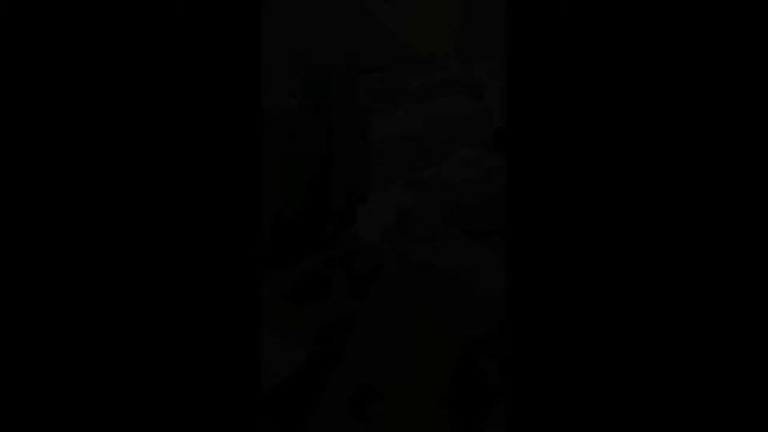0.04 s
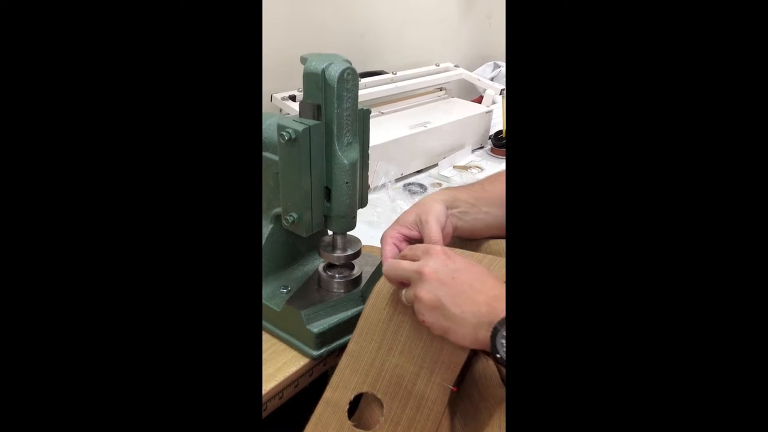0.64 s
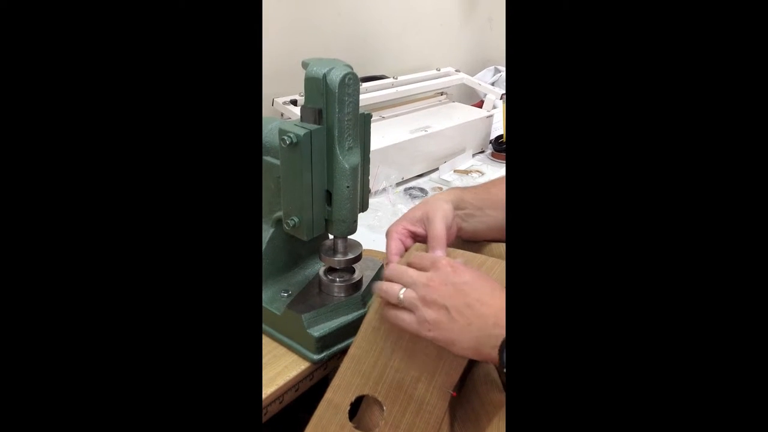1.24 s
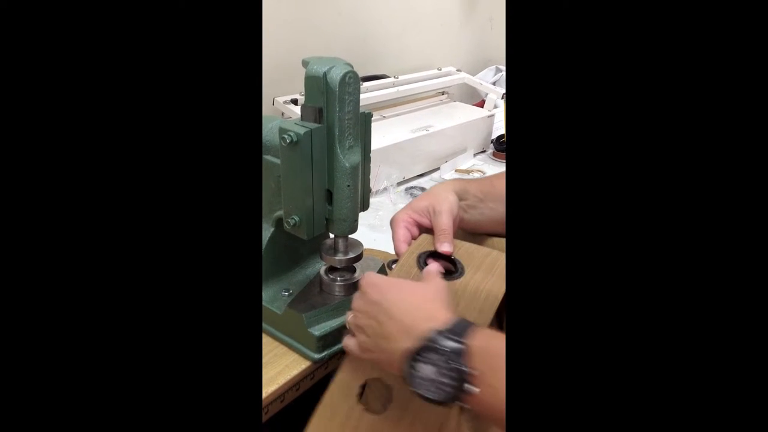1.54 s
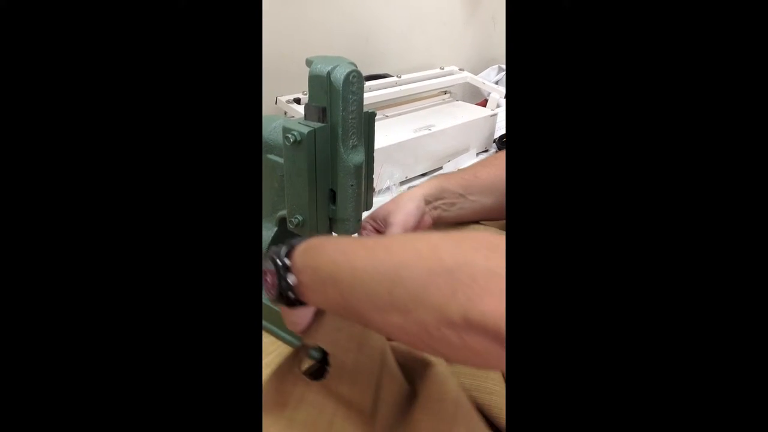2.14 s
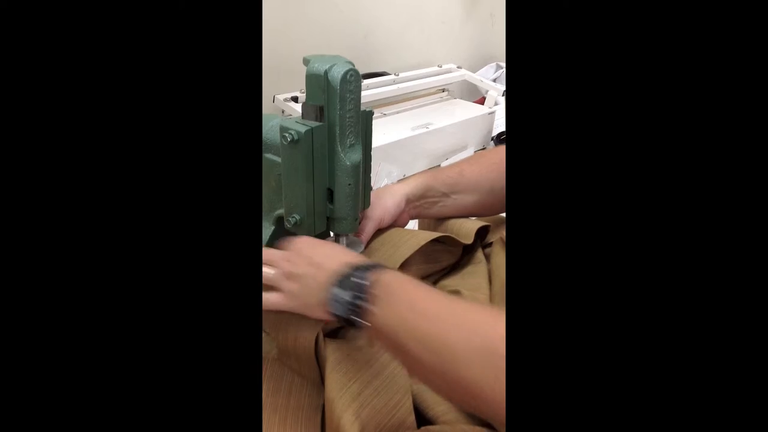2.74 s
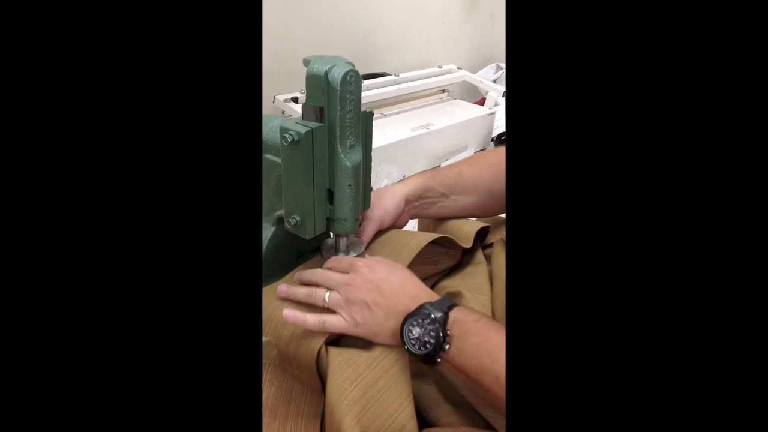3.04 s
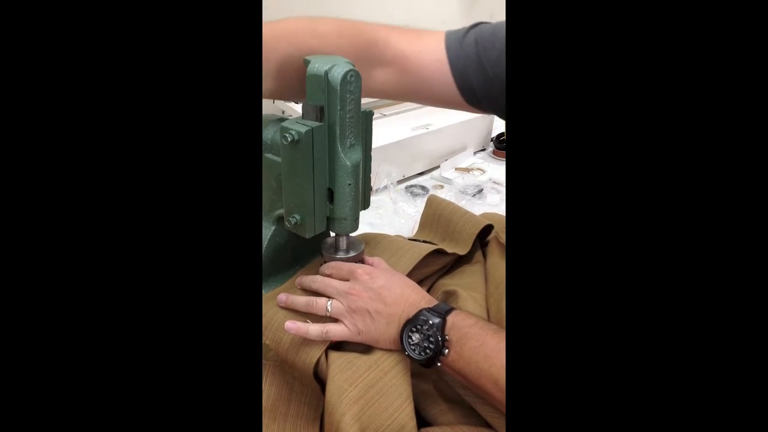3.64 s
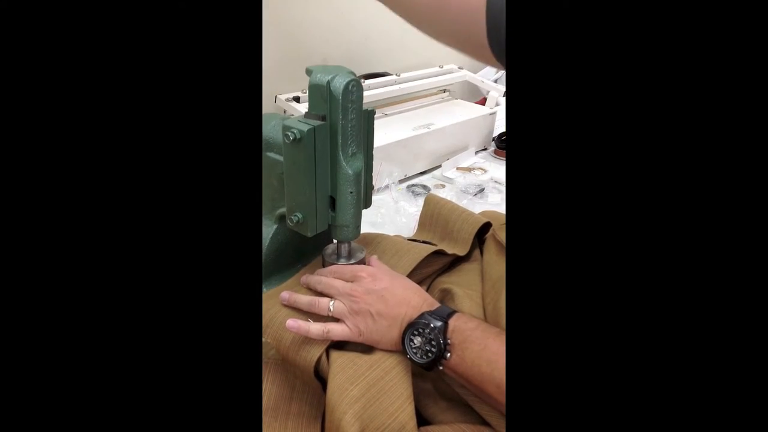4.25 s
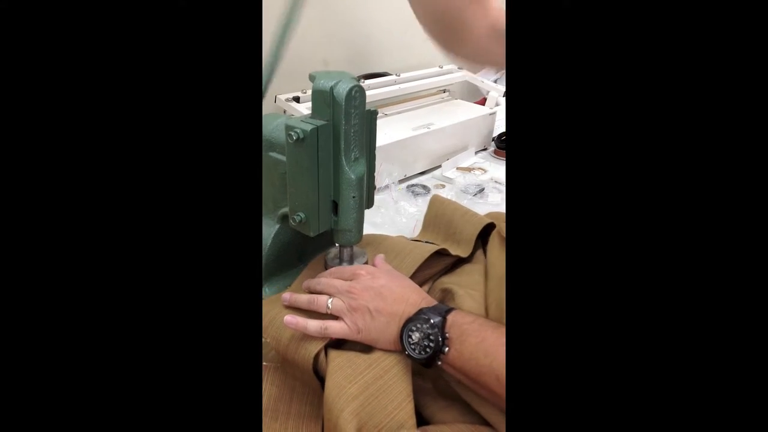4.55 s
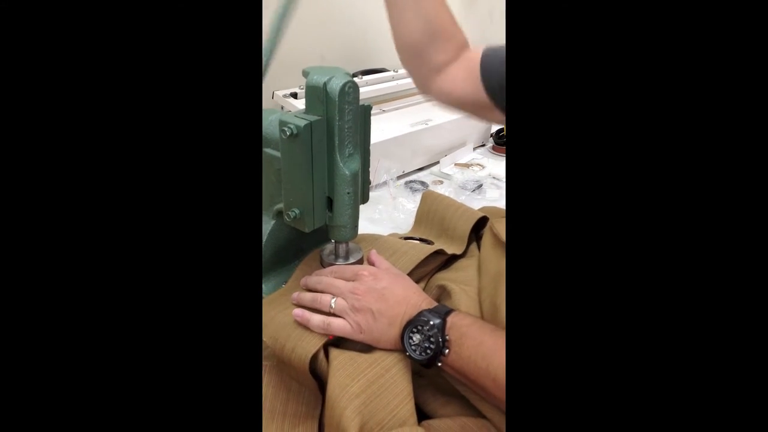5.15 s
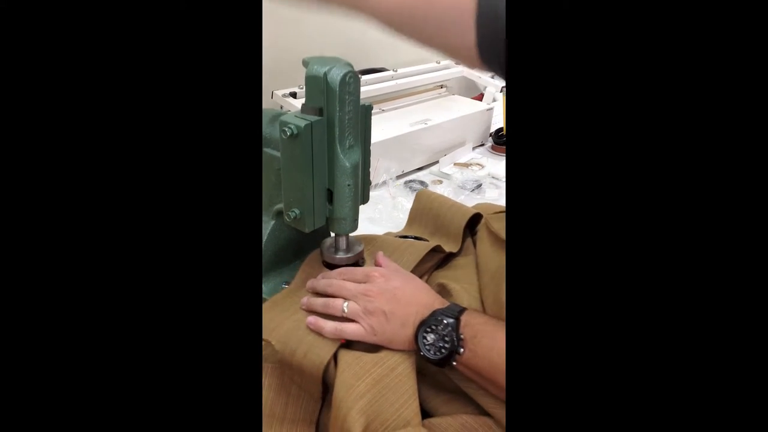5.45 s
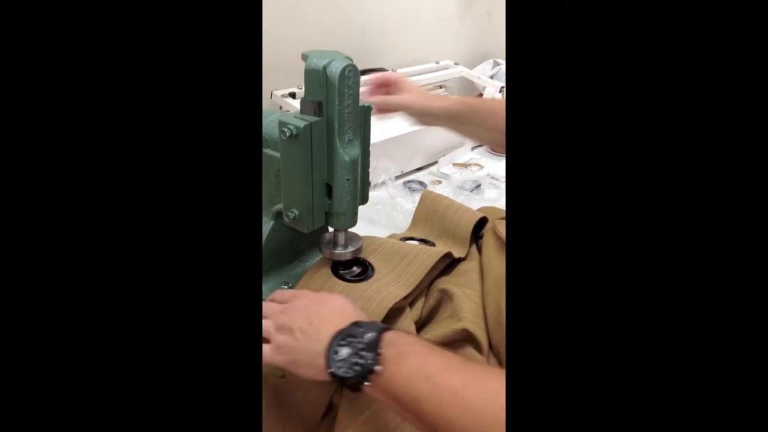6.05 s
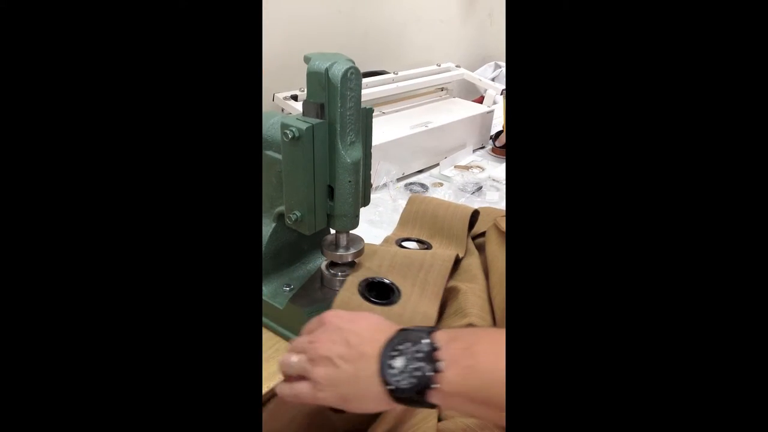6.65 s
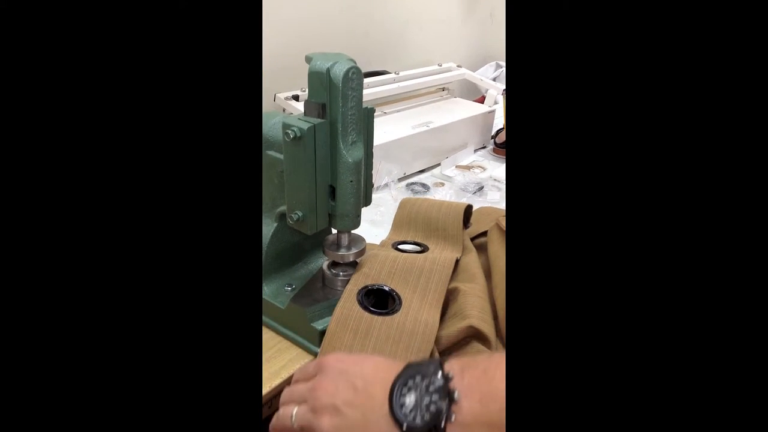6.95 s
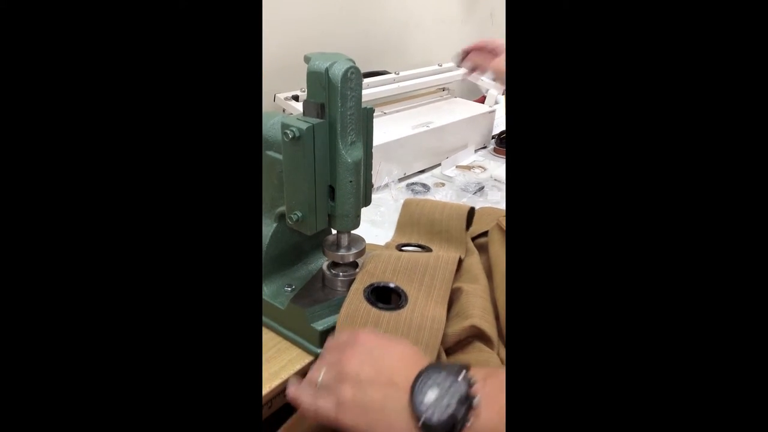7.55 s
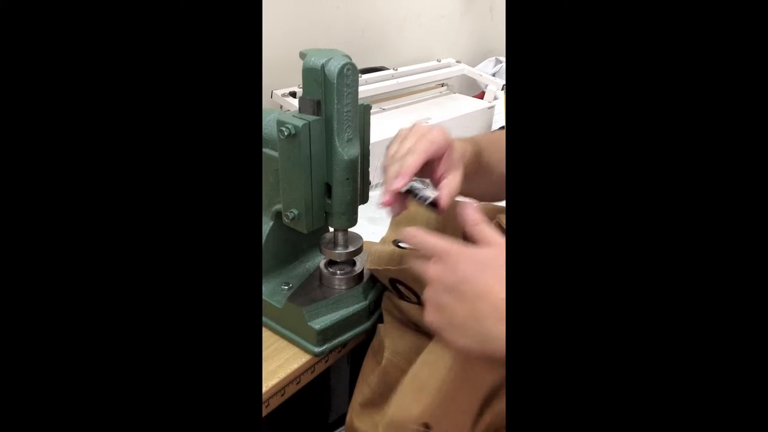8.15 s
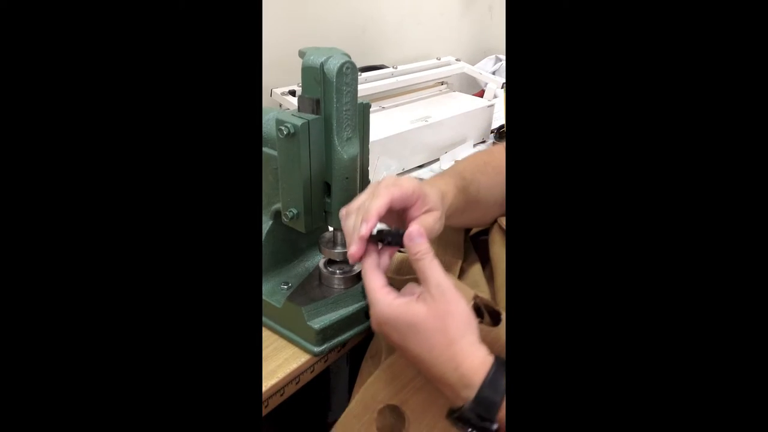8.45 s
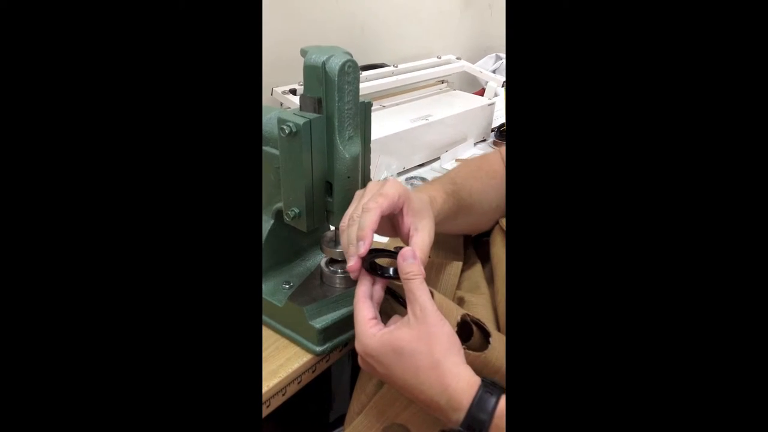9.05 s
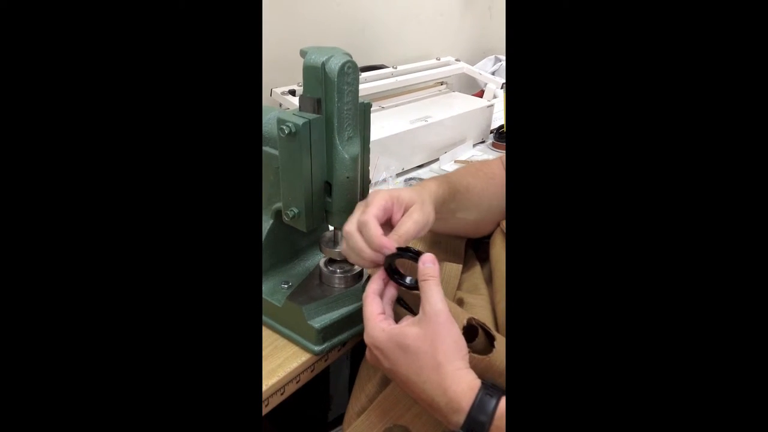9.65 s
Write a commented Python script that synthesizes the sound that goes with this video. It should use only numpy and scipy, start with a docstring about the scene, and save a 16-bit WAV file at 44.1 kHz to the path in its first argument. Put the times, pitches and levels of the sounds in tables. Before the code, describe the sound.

A hand-lever press crunches a metal ring into cloth and clacks back, amid small clinks, rustles and steady ventilation.

```python
"""Setting a curtain grommet

A hand-lever press works on a bench in a small room. Metal rings clink, the lever clunks down in its
iron frame, the ring crunches through the cloth, and the steel ram slides back and clacks on its stop.
Then the cloth is pulled away and the next ring is picked up, over the steady rush of ventilation."""
import sys
import numpy as np
from scipy import signal
from scipy.io import wavfile
from scipy.ndimage import uniform_filter1d

SR = 44100
rng = np.random.default_rng(int(sys.argv[2]) if len(sys.argv) > 2 else 0)


def to_wav(s):
    """Save 16-bit WAV."""
    ch = np.atleast_2d(s).T  # columns
    pcm = np.round(np.clip(ch, -1, 1) * 32767)  # PCM
    wavfile.write(sys.argv[1], SR, pcm.astype(np.int16))


N = 436149

# Knocks in the frame. Each row: start in seconds, relative level in dB, relative treble in dB.
KNOCKS = [(3.756, -31.5, -76), (3.799, -16, -28.5), (3.817, -22, -35.5), (3.878, -25, -48),
          (5.018, -21, -51), (5.035, -18.5, -37), (5.256, -15.5, -39), (5.268, -12.5, -42),
          (5.373, -27.5, -54), (5.68, -3.5, -22.5), (5.687, -8, -14), (5.765, -21.5, -38)]
# The tone of a knock. Each row: frequency in Hz, level in dB.
IRON_TONE = [(30, -49.5), (100, -21), (200, -1.5), (330, -6), (450, -7.5), (620, -1), (1100, 1),
             (1800, -3.5), (2700, -7.5), (4500, -11.5), (6000, -14), (7500, -20), (15000, -24.5)]
# The frame's notes. Each row: pitch in Hz, level in dB, seconds to die away.
FRAME_NOTES = [(188, -14, 0.24), (498, -6.5, 0.26), (571, 0, .2), (706, 0, 0.14), (932, -5, 0.14),
               (1048, -8, 0.12), (1207, -2, .22), (1325, -1, 0.11), (1480, -8, 0.16), (1873, -5.5, 0.41),
               (2450, -4.5, 0.21), (2570, -9, .17), (3106, -14.5, 0.17), (3660, -11, 0.18),
               (4030, -9.5, 0.22)]
def knocks():
    """The lever and ram knock in the iron frame and set it ringing."""
    return blows(KNOCKS, IRON_TONE, FRAME_NOTES, decay_s=0.062, body_db=-8, bite_db=-1.5, crack_db=0,
                 crack_time_share=0.55, ring_db=-19.5, tail_db=-22.5, tail_s=0.17)


# The grommet's snaps. Each row: start in seconds, relative level in dB, relative treble in dB.
SNAPS = [(4.345, -37, -45.5), (4.351, -33.5, -47), (4.472, -16.5, -19.5), (4.476, -22, -22),
         (4.502, -28, -25), (4.516, -29, -31), (4.533, -21.5, -16), (4.554, -16.5, -15),
         (4.618, -25.5, -53), (5.4225, -30.5, -38), (5.546, -27.5, -36.5)]
# The tone of a snap. Each row: frequency in Hz, level in dB.
SNAP_TONE = [(30, -32), (100, -14.5), (200, -1.5), (330, -5.5), (550, -9), (900, 0.5), (2000, -3.5),
             (4000, 0.5), (9000, 3), (15000, -1)]
# The grommet's brief notes. Each row: pitch in Hz, level in dB, seconds to die away.
GROMMET_NOTES = [(578, 1, .12), (1520, -3, .09), (3390, -1, .12)]
def snaps():
    """The ring's teeth snap through the cloth, settle, and let go of the die that shapes them."""
    return blows(SNAPS, SNAP_TONE, GROMMET_NOTES, decay_s=0.025, body_db=-11, bite_db=-7, crack_db=-2.5,
                 crack_time_share=1, ring_db=-20, tail_db=-31.5, tail_s=0.12)


# The ram's landing. Each row: start in seconds, level in dB.
RAM_LANDINGS = [(5.688, -20.5)]
# The ram's high notes. Each row: pitch in Hz, level in dB, seconds to die away.
RAM_NOTES = [(5400, -19, .08), (5900, -8, .05), (6100, -1, 0.066), (6060, -2, .05), (5970, -26, .33),
             (8280, -17, .1)]
def ram_stop():
    """The ram, the steel rod that the lever drives, rings when it lands on its stop."""
    out = np.zeros(N)
    for start, db in RAM_LANDINGS:
        add(out, start, amp(db) * ringing(RAM_NOTES, scatter_db=3))
    return out


# Thuds in the bench. Each row: start in seconds, relative level in dB.
THUDS = [(3.556, -41.5), (4.676, -30.5), (4.813, -28), (4.973, -35), (5.04, -29), (5.413, -33)]
# The bench's low notes. Each row: pitch in Hz, level in dB, seconds to die away.
BENCH_NOTES = [(126.6, -16, .2), (176.4, -6, 0.34), (215, -1.5, 0.12), (239, 0, 0.092), (352, -8, 0.18)]
def thuds():
    """The bench takes the load with a dull thud."""
    out = np.zeros(N)
    for start, db in THUDS:
        add(out, start, amp(db - 3.5) * ringing(BENCH_NOTES, contact_s=0.0027))
    return out


# Moves of the lever, and at 4.45 s the ring's crush through the cloth. Each row: start and length in seconds,
# scrape and hiss levels in dB, the groan's first and last pitch in Hz.
MOVES = [(3.757, 0.067, -41, -69, 1100, 800), (3.787, 0.075, -27.5, -59, 710, 450),
         (3.871, 0.08, -38.5, -65, 900, 1200), (4.45, 0.18, -34, -36, 560, 510),
         (4.675, .12, -46, -73, 1400, 1240), (4.799, .11, -35.5, -42, 740, 2800),
         (5.061, 0.14, -40.5, -43, 1210, 1450), (5.187, .2, -37, -56, 1110, 300),
         (5.348, 0.068, -33, -49, 900, 1240), (5.56, 0.17, -65.5, -58.5, 896, 770)]
# The tones of the scrape and the hiss. Each row: frequency in Hz, level in dB.
SCRAPE_TONE = [(40, -43), (120, -10), (200, 3), (400, 2), (600, 1.5), (900, -2.5), (1300, -1.5), (2400, -8),
               (3500, -12), (15000, -40)]
HISS_TONE = [(200, -23.5), (1500, 7.5), (3500, -1.5), (6000, 2), (9000, -0.5), (15000, -2)]
def rubbing():
    """The ram rubs along its guide, louder when faster; its groan glides as the load shifts. One stroke is
    instead the ring crunching through the cloth."""
    scrape = friction(SCRAPE_TONE, slips_per_s=2500, spread_db=0.5, flutter_db=1.5)
    hiss = friction(HISS_TONE, slips_per_s=8300, spread_db=1.5, flutter_db=0.8)
    out = np.zeros(N)
    for start, length, scrape_db, hiss_db, from_hz, to_hz in MOVES:
        speed = swell(length, peak_share=0.36, sharpness=1.31)
        slips = evened(during(scrape, start, len(speed)))
        groan = evened(resonate(slips, np.linspace(from_hz, to_hz, len(speed)), width_hz=220))
        add(out, start, speed * amp(scrape_db) * evened(slips + amp(-1.5) * groan))
        add(out, start, speed * amp(hiss_db) * evened(during(hiss, start, len(speed))))
    return out


# Taps. Each row: start in seconds, relative level in dB, treble against that level in dB, pitch in Hz.
TAPS = [(1.233, -38.5, -30, 1040), (1.608, -42.5, -20, 1510), (2.29, -37, -28, 1180),
        (2.307, -36, -19, 1840), (2.417, -33, -10.5, 2470), (2.485, -32, -37, 1350),
        (2.507, -38, -27, 1190), (2.656, -34.5, -11, 2630), (2.883, -39.5, -18, 4850),
        (3.258, -29.5, -19, 3600), (6.274, -46, -14, 3300), (6.412, -28, -19.5, 1340),
        (6.475, -32, -13, 3500), (7.684, -29, -14, 2450), (7.694, -36, -25, 1960),
        (7.702, -28.5, -13, 2930), (7.722, -25, -11, 2480), (7.726, -24.5, -8.5, 3800),
        (7.798, -23, -4, 1350), (7.823, -31, -8, 2170), (8.074, -36.5, -13, 3700),
        (8.239, -25.5, -12.5, 3870), (8.309, -31.5, -29, 2030)]
# The tone of a tap. Each row: frequency in Hz, level in dB.
TAP_TONE = [(30, -39), (200, -14), (700, -2), (1200, 0.5), (2300, 0.5), (3500, -1), (4500, -5), (6000, -2),
            (9000, -7.5), (15000, -15)]
def taps(split_hz=4500, click_s=0.013, tail_s=0.14, gentle_db=-39):
    """Loose rings tick on the die, the bench and each other, each with a brief pitch."""
    out = np.zeros(N)
    for start, db, treble_db, hz in TAPS:
        shiver_db = -27 + 0.5 * (db - gentle_db)  # harder taps shake what lies on the bench more
        body = rattle(TAP_TONE, (20, split_hz), click_s, shiver_db, tail_s)
        treble = rattle(TAP_TONE, (split_hz, SR / 2), click_s, shiver_db, tail_s)
        add(out, start, amp(db - 11) * body + amp(db + treble_db) * treble)
        add(out, start, amp(db - 12) * ringing([(hz, 0, 0.0076)]))
    return out


# Clinks of the washer. Each row: start in seconds, touch level in dB, ringing level in dB.
CLINKS = [(0.3077, -37, -51), (0.345, -48, -64), (0.451, -38.5, -34.5), (0.553, -50, -66),
          (0.945, -60, -70), (1.041, -56, -68), (6.848, -59, -62), (9.529, -53.5, -62)]
# The washer's bright notes. Each row: pitch in Hz, level in dB, seconds to die away.
WASHER_NOTES = [(3230, -14, 0.32), (3510, -13, 0.16), (3550, -12, 0.24), (4060, -13, 0.33),
                (5080, -13, 0.28), (6360, -7, 0.33), (8300, -6, 0.14), (8850, 2, 0.19), (9017, -2, .2),
                (10110, -10, 0.19), (11820, 4.5, 0.17), (13220, -14, .25), (14100, -4, .13),
                (14600, -4, 0.14)]
def clinks():
    """A fingertip or a ring touches the metal washer, which rings on when the fingers let it."""
    out = np.zeros(N)
    for start, touch_db, ring_db in CLINKS:
        add(out, start, amp(ring_db) * ringing(WASHER_NOTES))
        touch = rattle(HISS_TONE, (3000, SR / 2), decay_s=0.012, tail_db=-15.5, tail_s=0.18)
        add(out, start, amp(touch_db) * touch)
    return out


# Drags of the cloth over the bench. Each row: start in seconds, length in seconds, level in dB.
DRAGS = [(1.814, 0.52, -73), (2.27, 0.47, -61.5), (2.638, 0.12, -53.5), (3.13, 0.17, -63),
         (3.9, 0.32, -56.5), (4.144, 0.12, -59), (7.52, 0.64, -63), (7.97, 0.36, -58), (8.483, .3, -63.5)]
# The cloth stirs faintly under the hands. One row, laid out like a drag.
STIRRING = (1.0, 5.9, -67)
# Scuffs of a hand. Each row: start in seconds, level in dB, length in seconds.
SCUFFS = [(1.216, -48.5, 0.04), (1.358, -56, 0.052), (1.899, -54, 0.12), (2.481, -53.5, 0.036),
          (2.59, -48.5, 0.06), (4.094, -53.5, 0.054)]
# The tones of the rustle and of a scuff. Each row: frequency in Hz, level in dB.
RUSTLE_TONE = [(100, -13), (400, 3.5), (1500, -0.5), (3000, 2), (6000, 3.5), (9000, 0.5), (15000, 0.5)]
SCUFF_TONE = [(80, -20), (300, 3.5), (700, 0), (1400, -1), (2500, -8), (6000, -23.5), (15000, -26.5)]
def cloth():
    """The cloth rustles as it is dragged; a hand scuffs it with a duller sound."""
    speed, scuffs = np.zeros(N), np.zeros(N)
    for start, length, db in DRAGS + [STIRRING]:
        add(speed, start, amp(db) * swell(length, peak_share=0.38, sharpness=1.3))
    for start, db, length in SCUFFS:
        stroke = swell(length)
        noise = evened(colour(rng.standard_normal(len(stroke)), SCUFF_TONE))
        add(scuffs, start, amp(db) * stroke * noise)
    return scuffs + speed * friction(RUSTLE_TONE, slips_per_s=4100, spread_db=-3, flutter_db=1.4)


# The tone of the moving air. Each row: frequency in Hz, level in dB.
AIR_TONE = [(15, -72.5), (25, -43), (69, -17.5), (91, -16.5), (122, -3), (198, 0), (260, -4), (368, -4),
            (582, -10), (1080, -9.5), (1530, -14), (2850, -22), (4620, -27.5), (12200, -30), (15500, -33)]
def ventilation(level_db=-52.5):
    """Air rushes softly, and the duct lifts a few pitches above the rest."""
    rush = colour(rng.standard_normal(N), AIR_TONE)
    for hz, narrowness, db in [(199.5, 6.3, -9), (715, 9.8, -3), (1038, 12, -7.5)]:
        rush = rush + amp(db) * signal.lfilter(*signal.iirpeak(hz, narrowness, SR), rush)
    return amp(level_db) * evened(rush)


# How long the room echoes. Each row: frequency in Hz, seconds to die away.
ROOM_DECAY = [(100, 0.88), (450, 0.54), (900, 0.29), (2500, 0.34), (6000, 0.32), (15000, 0.22)]
def room(x, first_echo_s=0.0019, build_s=0.0021):
    """The walls of a small room return a blur of echoes; the low ones last longest."""
    hz, t, bands = signal.stft(rng.standard_normal(SR * 3 // 4), SR, nperseg=256)
    tail = signal.istft(bands * dying(t, value_at(ROOM_DECAY, hz)[:, None]), SR, nperseg=256)[1]
    since_first = np.maximum(np.arange(len(tail)) / SR - first_echo_s, 0)
    tail *= 1 - np.exp(-since_first / build_s)
    return signal.fftconvolve(x, tail / np.linalg.norm(tail))[:N]


def blows(rows, tone, notes, decay_s, body_db, bite_db, crack_db, crack_time_share, ring_db,
          tail_db, tail_s, low_hz=1800, high_hz=4800):
    """Each blow has a low body, ringing notes, a bite in the middle and a high crack."""
    out = np.zeros(N)
    for start, db, treble_db in rows:
        add(out, start, amp(db + body_db) * rattle(tone, (20, low_hz), decay_s, tail_db, tail_s))
        add(out, start, amp(db + ring_db) * ringing(notes, contact_s=0.002))
        bite = rattle(tone, (low_hz, high_hz), decay_s / 2, tail_db, tail_s)
        add(out, start, amp((db + treble_db) / 2 + bite_db) * bite)
        crack = rattle(tone, (high_hz, SR / 2), crack_time_share * decay_s, tail_db, tail_s)
        add(out, start, amp(treble_db + crack_db) * crack)
    return out


def ringing(notes, scatter_db=0, contact_s=0.00019):
    """A struck object rings with several dying notes; a longer contact starts them more gently."""
    t = np.arange(SR // 2) / SR
    hz, db, decay_s = np.transpose(notes)[:, :, None]
    strength = amp(db + scatter_db * rng.standard_normal(db.shape)) * rng.choice([-1, 1], db.shape)
    waves = strength * dying(t, decay_s) * np.sin(2 * np.pi * hz * t)
    return peaked(waves.sum(0) * np.tanh(t / contact_s) ** 2)


def rattle(tone, band_hz, decay_s, tail_db, tail_s):
    """One band of a blow: a burst of tiny contacts, then the shiver of what lies nearby."""
    t = np.arange(SR // 3) / SR
    contacts = rng.standard_normal(len(t)) * (dying(t, decay_s) + amp(tail_db) * dying(t, tail_s))
    band = signal.butter(3, np.clip(band_hz, 20, SR / 2 - 1000), "band", fs=SR, output="sos")
    return peaked(signal.sosfilt(band, colour(contacts, tone)))


def friction(tone, slips_per_s, spread_db, flutter_db):
    """Rubbing is countless tiny slips of uneven size, coming in clumps."""
    slips = (rng.random(N) < slips_per_s / SR) * rng.standard_normal(N)
    sizes = amp(spread_db * np.minimum(rng.exponential(1, N), 4))
    smoother = signal.get_window("hann", SR // 40)
    clumps = evened(signal.oaconvolve(rng.standard_normal(N), smoother, "same"))
    return evened(colour(slips * sizes * amp(flutter_db * clumps), tone))


def swell(length, peak_share=0.25, sharpness=1):
    """The speed of a hand stroke: from rest, fastest at peak_share of its length, back to rest."""
    progress = np.linspace(0, 1, round(length * SR))
    skew = np.log(0.5) / np.log(peak_share)
    return abs(np.sin(np.pi * progress ** skew)) ** sharpness


def resonate(x, hz, width_hz):
    """Brings out a gliding pitch: shifts it down to zero, smooths, and shifts back."""
    turn = np.exp(2j * np.pi * np.cumsum(hz) / SR)
    memory = np.exp(-np.pi * width_hz / SR)
    return 2 * (turn * signal.lfilter([1 - memory], [1, -memory], x / turn)).real


def colour(x, tone, size=4096):
    """Gives a sound a tone. The filter never sounds ahead of a hit, so hits stay sharp."""
    log_gain = np.log(amp(value_at(tone, abs(np.fft.fftfreq(size, 1 / SR)))))
    response = np.fft.ifft(np.exp(np.conj(signal.hilbert(log_gain)))).real
    return signal.oaconvolve(x, response[:size // 2])[:len(x)]


def value_at(table, hz):
    """Reads between a table's rows, on a scale of octaves."""
    row_hz, values = np.transpose(table)
    return np.interp(np.log(hz + 1), np.log(row_hz + 1), values)


def amp(db):
    return 10 ** (np.asarray(db) / 20)


def dying(t, decay_s):
    """Dies away by 60 dB in decay_s seconds."""
    return np.exp(-np.log(1000) * t / np.maximum(decay_s, 1e-3))


def evened(x):
    """Scales a sound to an average power of 1."""
    return x / np.sqrt(np.mean(x ** 2) + 1e-20)


def peaked(x):
    """Scales a blow so that its loudest 4 milliseconds have a power of 1."""
    return x / np.sqrt(uniform_filter1d(x ** 2, 176, mode="constant").max() + 1e-20)


def during(x, start, samples):
    return x[round(start * SR):][:samples]


def add(mix, start, sound):
    part = during(mix, start, len(sound))
    part += sound[:len(part)]


def scene():
    """Press, hands and air in one room. The hands are closer, so they have a little less echo."""
    press = knocks() + snaps() + ram_stop() + thuds() + rubbing()
    hands = taps() + clinks() + cloth()
    echoes = amp(-7.5) * room(press) + amp(-8) * room(hands)
    return (press + hands + echoes + ventilation())[None]


def record(dry, threshold_db=-19, cut_share=0.39, recover_db_per_s=1.9, ceiling=0.9, top_hz=15450):
    """Gain control dips after loud clacks and recovers slowly; peaks are rounded, top treble is cut."""
    t = np.arange(N) / SR
    power_db = 10 * np.log10(abs(uniform_filter1d(dry[0] ** 2, size=441)) + 1e-12)
    cut_db = cut_share * np.maximum(power_db - threshold_db, 0)
    held_db = np.maximum.accumulate(cut_db + recover_db_per_s * t) - recover_db_per_s * t
    turned_down = dry * amp(-uniform_filter1d(held_db, size=220))
    rounded = ceiling * np.tanh(turned_down / ceiling)
    fade_in = np.clip((t - 0.087) / 0.46, 0, 1) ** 1.2
    treble_cut = signal.firwin(401, top_hz, window=("kaiser", 8), fs=SR)
    return signal.oaconvolve(rounded * fade_in, treble_cut[None], "same")


dry = scene()
out = record(dry)
to_wav(out)
```